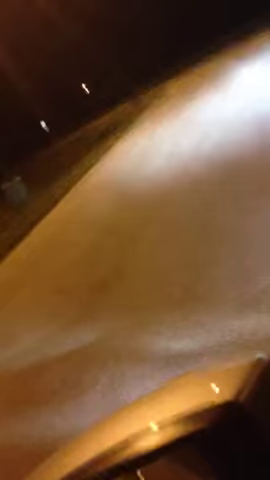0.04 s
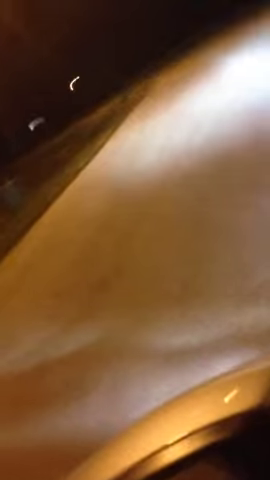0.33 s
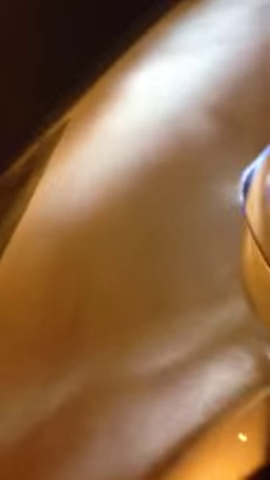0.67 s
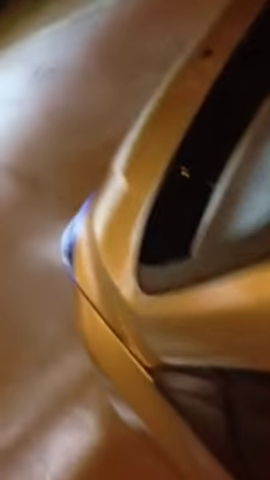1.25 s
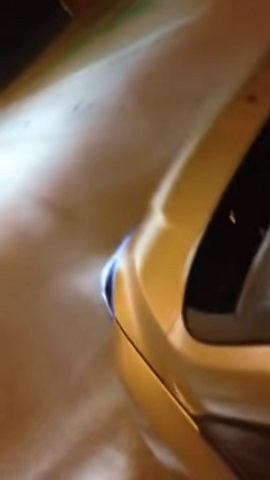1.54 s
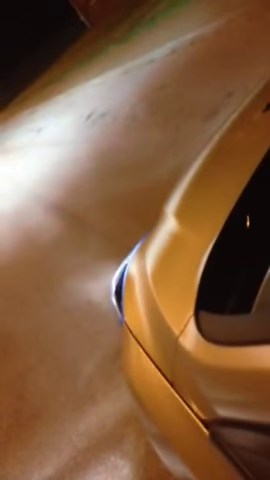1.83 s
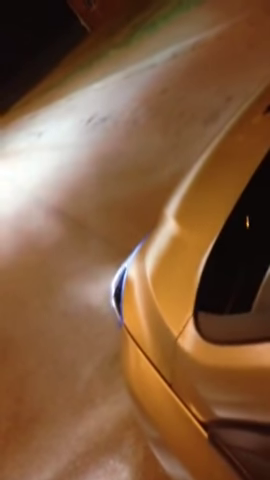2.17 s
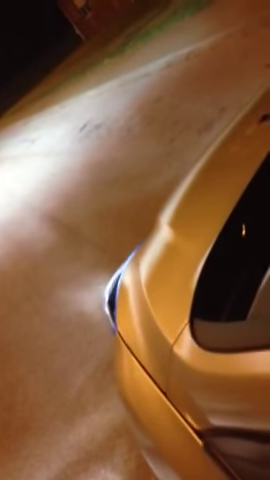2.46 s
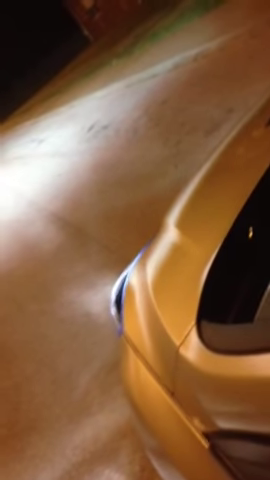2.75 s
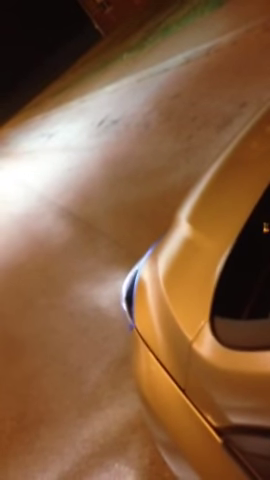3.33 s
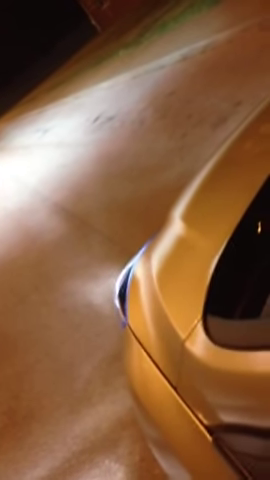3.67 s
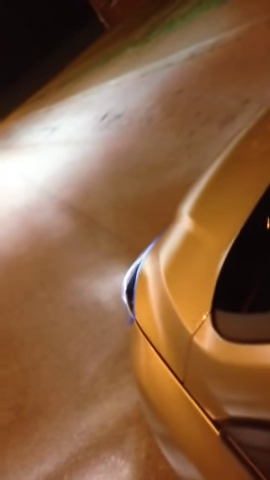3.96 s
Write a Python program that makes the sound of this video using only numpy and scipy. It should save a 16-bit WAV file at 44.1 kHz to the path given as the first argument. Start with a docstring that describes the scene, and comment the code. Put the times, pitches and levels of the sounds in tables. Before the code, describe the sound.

A turbocharged car engine goes from a low idle to full revs, then bounces off the limiter in a rough roar with exhaust thumps and rushing air. Crickets are barely heard outdoors before the revs rise.

```python
"""Turbo four, idle to rev limiter.

A parked turbocharged four-cylinder car idles at night among faint crickets, then is floored.
The intake chirps, the crank orders climb through the exhaust resonances and the turbo spools up.
On the limiter, short bursts of firing thump and kick the speed up; between them it sags
under a hard roar."""
import sys
import numpy as np
from scipy import signal
from scipy.fft import rfft, irfft
from scipy.io import wavfile

SR = 44100
rng = np.random.default_rng(int(sys.argv[2]) if len(sys.argv) > 2 else 0)


def master_out(mix):
    """Clip the mix to full scale and print it as 16-bit PCM to the path in sys.argv[1]."""
    frames = np.transpose(np.atleast_2d(mix))
    ceiling = np.clip(frames, -1, 1)
    pcm = np.round(ceiling * 32767).astype(np.int16)
    wavfile.write(sys.argv[1], SR, pcm)


N = 176400

# Engine effort. Each row: time in seconds, then exhaust note, rasp and air hiss gains in dB.
ENGINE_EFFORT = [(0, -53, -72, -88), (1.6, -50.5, -57.5, -80), (1.8, -42, -48, -58.5),
                 (1.92, -32, -47, -59), (2.01, -28.5, -46, -56.5), (2.06, -22, -39, -57),
                 (2.15, -18.5, -39, -50), (2.24, -20, -33, -47.5), (2.36, -19.5, -29.5, -38.5),
                 (2.55, -15.5, -31, -39.5), (3.0, -17, -33.5, -37), (4.0, -19.5, -33.5, -37)]
# Limiter bursts. Each row: start in seconds, thump level in dB, depth of the following dip in dB,
# held gain of the firing note in dB, held gain of the higher orders in dB.
LIMITER_BURSTS = [(2.37, -33, 3, 2.5, -0.5), (2.595, -27, 7, 5, 0.5), (2.877, -25, 9, 7, 0),
                  (3.168, -29.5, 9, 6.5, -1), (3.458, -29, 7.5, 7.7, 0.5), (3.726, -27, 8.5, 7.9, 1),
                  (3.99, -33, 6, 19, -12.5)]
# Turbo spool-up. Each row: time in seconds, nominal whistle pitch in Hz, base level in dB.
TURBO_SPOOL = [(1.85, 3700, -76), (2.2, 5850, -70), (2.36, 7850, -53), (2.45, 8680, -71), (2.7, 9882, -54),
               (2.86, 9700, -54.5), (3.05, 10160, -62), (3.5, 10390, -60), (4.0, 10600, -63)]
THUMP_LAG_S, THUMP_WIDTH_S = 0.024, 0.024


def undb(db):
    """Decibels to gain."""
    return 10 ** (np.asarray(db) / 20)


def unit(x):
    """Scale to rms 1."""
    return x / np.sqrt(np.mean(x ** 2))


def curve(t, table, column=1):
    """One table column, interpolated over time."""
    rows = np.array(table)
    return np.interp(t, rows[:, 0], rows[:, column])


def during(t, table):
    """Gate: open between a table's first and last times."""
    return (t > table[0][0]) & (t < table[-1][0])


def response(hz, spectrum):
    """Gain of a (Hz, dB) spectrum at hz."""
    rows = np.array(spectrum)
    return undb(np.interp(np.log(hz + 1), np.log(rows[:, 0]), rows[:, 1]))


def colour(x, spectrum):
    """Filter by a spectrum; rms 1."""
    return unit(irfft(rfft(x) * response(np.fft.rfftfreq(N, 1 / SR), spectrum), N))


def band(hz, width_hz):
    """Bell-shaped noise band, rms 1; at 0 Hz, a random flutter."""
    bell = np.exp(-2 * ((np.fft.rfftfreq(N, 1 / SR) - hz) / width_hz) ** 2)
    return unit(irfft(rfft(rng.standard_normal(N)) * bell, N))


def turns(hz):
    """Cycles completed at a changing rate."""
    return np.cumsum(hz) / SR


def breathy(hz, width_hz):
    """Narrow noise band gliding near hz; rms 1."""
    carrier = np.exp(2j * np.pi * turns(hz - width_hz / 3))
    return unit(np.real(signal.hilbert(band(0, width_hz)) * carrier))


def puffs(cycles, depth):
    """Noise swelling once per cycle."""
    return rng.standard_normal(N) * np.exp(depth * np.cos(2 * np.pi * cycles))


def swell(t, lag_s, width_s, sizes=None):
    """A Gaussian hump lag_s after each limiter burst."""
    sizes = np.ones(len(LIMITER_BURSTS)) if sizes is None else sizes
    return sum(size * np.exp(-((t - start_s - lag_s) / width_s) ** 2)
               for (start_s, *_), size in zip(LIMITER_BURSTS, sizes))


def firing_rate(t):
    """Run-up, then a sawtooth: each burst kicks the speed to the limit and it sags again."""
    # Each row: time in seconds, firing rate in Hz.
    run_up = [(0, 50.5), (1.3, 51), (1.5, 55.5), (1.7, 60), (1.8, 62.5), (1.9, 88), (2.0, 121), (2.1, 148),
              (2.2, 172), (2.3, 211), (2.375, 233)]
    limit_hz, kick_s, sag_hz_per_s, jitter = 246.9, 0.02723, 63, 0.0031
    hz = curve(t, run_up)
    for start_s, *_ in LIMITER_BURSTS:
        kick = np.clip((t - start_s) / kick_s, 0, 1)
        sagging_hz = limit_hz - sag_hz_per_s * (t - start_s - kick_s)
        hz = hz * (1 - kick) + kick * sagging_hz
    return hz * (1 + jitter * band(0, 49.7))


def limiter_gains_db(t):
    """Boom, bark and dip at each burst, for order 1, order 2 (firing note) and the orders above."""
    starts_s, _, dips_db, notes_db, overtones_db = np.array(LIMITER_BURSTS).T
    dip_lag_s = 0.054

    def held(levels_db):
        steps_db = np.diff(levels_db, prepend=0)
        return sum(db * np.clip((t - s) / dip_lag_s, 0, 1) for s, db in zip(starts_s, steps_db))

    dip_db = swell(t, dip_lag_s, 0.035, dips_db)
    late_dip_db = swell(t, 0.064, 0.014, dips_db)
    boom_db = 6 * swell(t, 0.032, THUMP_WIDTH_S)
    bark_db = 3.5 * swell(t, THUMP_LAG_S, THUMP_WIDTH_S)
    return boom_db - late_dip_db, held(notes_db) - dip_db, held(overtones_db) + bark_db - late_dip_db


def exhaust(t, crank_hz):
    """Crank orders sound through the pipe's resonances; unequal cylinders add half orders."""
    # Each row: multiple of the crank rate, gain in dB up to the limiter, in dB on it, rms flutter in dB.
    orders = [(1, 2.5, -5.5, 3), (2, 4.5, 0, 1.06), (3, -4, -4, 3), (4, -9, -0.5, 1.56), (5, -9, -4.5, 0.5),
              (6, -10, -15, 2), (7, -20, -7.5, 4), (8, -14.5, -8.5, 4), (9, -15.5, -17, 4.5),
              (10, -13.5, -8.5, 2.5), (11, -27.5, -22.5, 5), (12, -15, -17, 5)]
    # Exhaust response. Each row: frequency in Hz, gain in dB.
    pipe = [(25, -34), (38, -19), (48, -3.5), (60, -8), (68, -4), (83, -4), (100, -12), (120, -9),
            (160, -29), (195, -18.5), (212, -6), (238, -5.5), (252, -4.5), (275, -17.5), (325, -5),
            (360, -17), (400, -23), (455, -0.5), (492, -6), (545, -11), (605, -11.5), (670, -35.5),
            (900, -19.5), (1250, -24), (1600, -18)]
    limiter_s, blend_s, smear_rad = 2.25, 0.09, 0.13
    boom_db, note_db, overtone_db = limiter_gains_db(t)
    on_limiter = np.clip((t - limiter_s) / blend_s, 0, 1)
    crank_rad = 2 * np.pi * turns(crank_hz)
    out = 0
    for k, climb_db, limit_db, flutter_db in orders:
        db = (1 - on_limiter) * climb_db + on_limiter * limit_db + flutter_db * band(0, 57)
        db += boom_db if k == 1 else note_db if k == 2 else overtone_db
        tone = -np.cos(k * crank_rad + smear_rad * k * rng.standard_normal())
        out += undb(db) * response(k * crank_hz, pipe) * tone
        if k > 1:
            half_db = -24.5 + 4 * on_limiter + 1.5 * band(0, 20)
            half_tone = np.cos((k + 0.5) * crank_rad + band(0, 6.7))
            out += undb(half_db) * response((k + 0.5) * crank_hz, pipe) * half_tone
    return np.sqrt(2) * out * undb(curve(t, ENGINE_EFFORT))


def thumps(t):
    """Each burst opens with a short grunt and rings a low exhaust resonance."""
    ring_hz, grunt_hz = 82, 330
    ring = np.sqrt(2) * np.sin(2 * np.pi * ring_hz * t) + undb(-2) * band(ring_hz, ring_hz / np.e)
    grunt = band(grunt_hz, 60) * undb(-37.5) * swell(t, 0, THUMP_WIDTH_S)
    gains = undb(np.array(LIMITER_BURSTS)[:, 1])
    return grunt + ring * swell(t, THUMP_LAG_S, THUMP_WIDTH_S, gains)


def crackle(t, crank_turns):
    """Unburnt fuel from the cut barks in the pipe as firing resumes."""
    # Each row: frequency in Hz, relative density in dB.
    spectrum = [(300, -25), (650, -10), (950, -8), (1250, 9), (1700, -15), (2500, -8), (3500, -10),
                (8000, -45)]
    bark = colour(puffs(crank_turns, depth=0.67), spectrum)
    return bark * undb(-40.5) * swell(t, lag_s=0.039, width_s=0.02)


def tailpipe_rasp(t, firings):
    """Gas noise pulsing once per firing, louder at each burst."""
    # Each row: frequency in Hz, relative density in dB.
    spectrum = [(40, -13), (90, -5), (170, 1), (300, 0), (420, 0.5), (540, 0.5), (680, -6.5), (950, -8.5),
                (1080, -10), (1220, -6.5), (1550, -19), (1950, -11), (2600, -20.5), (3200, -24.5),
                (8000, -44)]
    db = curve(t, ENGINE_EFFORT, column=2) + 3 * swell(t, lag_s=0.037, width_s=0.06)
    return colour(puffs(firings, depth=0.21), spectrum) * undb(db)


def silencer_growl(t):
    """The silencer growls while the revs climb."""
    # Each row: time in seconds, level in dB.
    levels = [(1.85, -68), (1.95, -48), (2.04, -40), (2.15, -32.5), (2.22, -30.5), (2.3, -25.5),
              (2.38, -56), (2.45, -68)]
    return band(hz=477, width_hz=62) * undb(curve(t, levels)) * during(t, levels)


def bay(x):
    """Narrow resonances of the engine bay colour sound from under the bonnet."""
    # Each row: centre in Hz, width in Hz, boost in dB.
    resonances = [(1837, 96, 10.5), (1990, 37, 4.5), (2160, 49, 8.5), (2450, 58, 5), (2580, 72, 8),
                  (2734, 53, 10.5), (3137, 51, 10.5), (3564, 93, 6.5), (4195, 40, 8), (4450, 66, 6),
                  (4840, 90, 4), (5760, 57, 3), (6330, 120, 4)]
    hz = np.fft.rfftfreq(N, 1 / SR)
    db = sum(boost_db / (1 + (2 * (hz - centre_hz) / width_hz) ** 2)
             for centre_hz, width_hz, boost_db in resonances)
    return irfft(rfft(x) * undb(db), N)


def air_hiss(t, crank_turns):
    """Rushing air brightens as the turbo gains speed and dips at each burst."""
    # Each row: frequency in Hz, relative gain in dB.
    spectrum = [(700, -25), (1900, -3), (2600, -4), (3100, -9.5), (3400, -6), (3600, -0.5), (3900, -3),
                (4400, -1.5), (5300, -4), (6600, -0.5), (7000, -8), (8300, -4), (10000, -8.5),
                (12400, -9.5), (13000, -12), (15200, -21)]
    shelf_hz, shelf_db = 6640, -8.5
    air = colour(bay(puffs(crank_turns, depth=0.1)), spectrum)
    low = signal.sosfiltfilt(signal.butter(6, shelf_hz, fs=SR, output="sos"), air)
    spool_hz = curve(t, TURBO_SPOOL)
    darkness = np.clip(2 * (1 - spool_hz / spool_hz.max()), 0, 1)
    air = low + (air - low) * undb(shelf_db * darkness)
    dip_db = 2.5 * swell(t, lag_s=0.029, width_s=0.088)
    flutter_db = 1.217 * band(0, 22)
    return air * undb(curve(t, ENGINE_EFFORT, column=3) - dip_db + flutter_db)


def turbo_whistle(t):
    """The whistle climbs with the spool; pitch and level flare at each burst."""
    lag_s = 0.056
    hz = curve(t, TURBO_SPOOL) + 1440 * swell(t, lag_s, width_s=0.06)
    flare_db = 10.5 * swell(t, lag_s, width_s=0.014)
    flutter_db = 7.5 * band(0, 80)
    db = curve(t, TURBO_SPOOL, column=2) + flare_db + flutter_db
    return breathy(hz, width_hz=750) * undb(db) * (t > TURBO_SPOOL[0][0])


def intake_chirp(t):
    """The intake chirps as the throttle opens: one gliding band, one steady."""
    # Each row: time in seconds, nominal pitch in Hz, gain in dB.
    glide = [(1.68, 1800, -82), (1.72, 1900, -58), (1.76, 2550, -59), (1.81, 3100, -59), (1.85, 2200, -53),
             (1.9, 2160, -62.5), (2.02, 2200, -58), (2.15, 2200, -81)]
    chirp = breathy(curve(t, glide), width_hz=340) + undb(-5.5) * band(hz=2430, width_hz=82)
    flutter_db = 0.5 * band(0, 44)
    return bay(chirp) * undb(curve(t, glide, column=2) + flutter_db) * during(t, glide)


def clatter(firings):
    """Engine clatter pulsing per firing, plus a ringing tick per crank turn."""
    # Each row: frequency in Hz, relative gain in dB.
    spectrum = [(30, -21), (55, -6.5), (80, -21), (120, -7.5), (180, -16), (250, -13), (310, -20.5),
                (358, -6), (400, -12), (600, -16.5), (1000, -23.5), (1400, -27), (1850, -30), (2200, -33.5),
                (4100, -30.5), (5200, -33.5), (6200, -39), (15000, -41)]
    tick_hz, decay_turns = 1813, 0.28
    rattle = colour(bay(puffs(firings, depth=0.13)), spectrum)
    ticks = unit(band(tick_hz, 130) * np.exp(-(firings / 2 % 1) / decay_turns))
    return rattle * undb(-54) + ticks * undb(-71)


def knock(t):
    """One soft, low knock at idle."""
    start_s, decay_s = 0.908, 0.009
    envelope = (t > start_s) * np.exp(-np.abs(t - start_s) / decay_s)
    return band(hz=100, width_hz=220) * envelope * undb(-45)


def belt_swish(t):
    """A belt swishes periodically at idle, then fades."""
    peak_s, period_s, end_s, fade_s = 0.16, 0.144, 1.15, 0.1
    pulse = 0.5 + 0.5 * np.cos(2 * np.pi * (t - peak_s) / period_s)
    fade = np.clip((end_s - t) / fade_s, 0, 1)
    return band(hz=4300, width_hz=2100) * pulse * fade * undb(-64)


def crickets(t):
    """Short, thin chirps from the grass."""
    # Each row: centre time in seconds, length in seconds, pitch in Hz, level in dB.
    chirps = [(0.153, 0.073, 8900, -77), (.32, .08, 8800, -78), (.51, .08, 8700, -78),
              (0.736, 0.11, 8400, -78), (0.857, 0.081, 8900, -81), (1.21, .08, 8850, -73),
              (1.39, .07, 8750, -71), (1.56, .08, 8820, -76)]
    return sum(band(hz, 200) * undb(db) * np.exp(-(2 * (t - centre_s) / length_s) ** 4)
               for centre_s, length_s, hz, db in chirps)


def scene():
    """Mono mix; one engine speed drives the exhaust, gas noise and clatter."""
    t = np.arange(N) / SR
    firing_hz = firing_rate(t)
    firings = turns(firing_hz)
    crank_hz, crank_turns = firing_hz / 2, firings / 2  # two firings per turn
    mix = exhaust(t, crank_hz) + thumps(t) + crackle(t, crank_turns)
    mix += tailpipe_rasp(t, firings) + silencer_growl(t)
    mix += air_hiss(t, crank_turns) + turbo_whistle(t) + intake_chirp(t)
    mix += clatter(firings) + knock(t) + belt_swish(t) + crickets(t)
    return mix[None]


def record(dry):
    """A moment of silence at the start; steep low-pass."""
    start_s, cutoff_hz = 0.12, 15250
    lowpass = signal.ellip(10, 0.2, 80, cutoff_hz, fs=SR, output="sos")
    return signal.sosfilt(lowpass, dry * (np.arange(N) / SR > start_s))


dry = scene()
out = record(dry)
master_out(out)
```